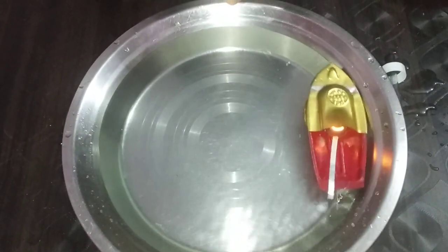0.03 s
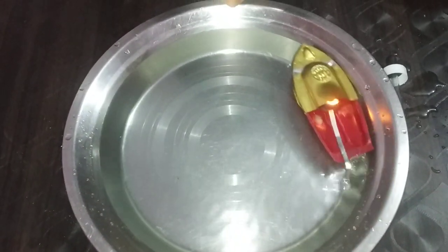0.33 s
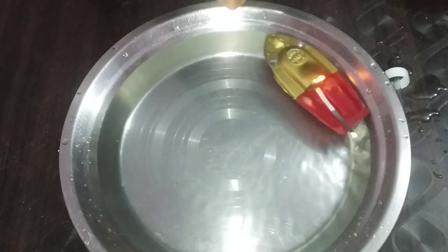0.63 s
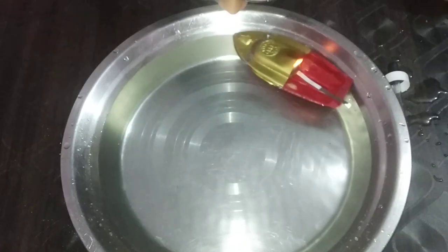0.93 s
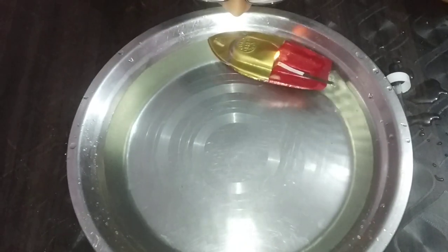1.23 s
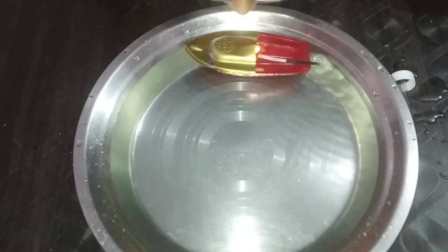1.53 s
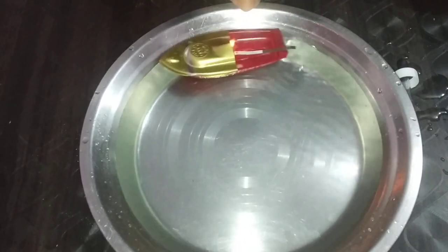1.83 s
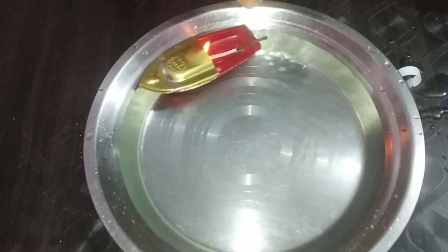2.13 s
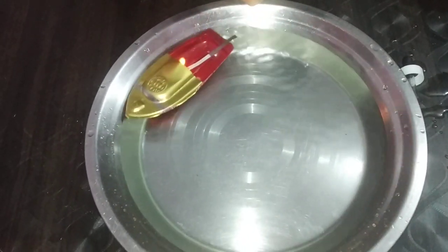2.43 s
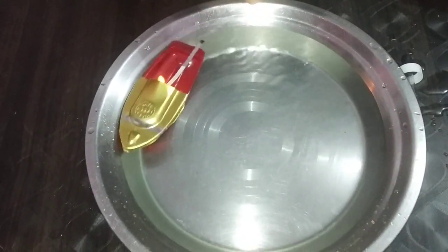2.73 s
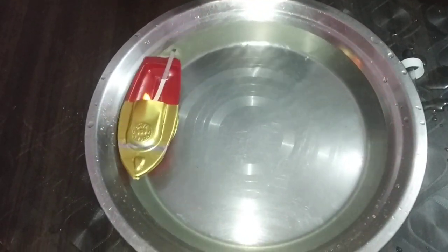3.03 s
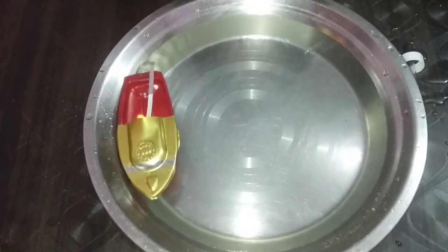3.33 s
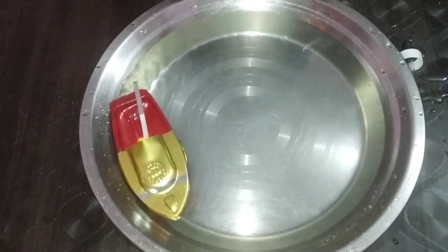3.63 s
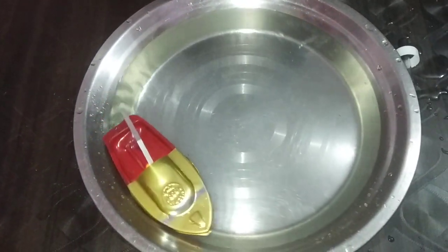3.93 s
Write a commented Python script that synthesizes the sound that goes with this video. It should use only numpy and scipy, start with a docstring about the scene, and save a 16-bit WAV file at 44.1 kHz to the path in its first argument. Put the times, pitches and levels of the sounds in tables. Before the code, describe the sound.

Rapid tinny popping of a toy steam boat circling in water, faltering twice.

```python
"""A tin pop-pop boat circling in a steel basin

About 22 times a second the boiler lid snaps out and back, a spit of hiss follows, and the
thin hull rings. Twice the steam sags and picks up again. Water ticks and splashes at the
stern, bubbles burst, the basin is bumped, and a small room hums underneath."""
import sys
import numpy as np
from scipy import signal
from scipy.fft import rfft, irfft
from scipy.io import wavfile
from scipy.ndimage import uniform_filter1d, map_coordinates

SR = 44100
rng = np.random.default_rng(int(sys.argv[2]) if len(sys.argv) > 2 else 0)


def wrap_up_sound(samples):
    """Save the sound to the file named by the first command line argument, as 16-bit audio."""
    columns = np.atleast_2d(samples).T
    # keep every value between -1 and 1, then stretch to whole-number steps
    tamed = np.clip(columns, -1, 1)
    steps = np.round(tamed * 32767).astype(np.int16)
    wavfile.write(sys.argv[1], SR, steps)


N = 176400  # 4 seconds

# The boat's path. Each row: time in seconds, left ear's delay in ms, left minus right level in dB.
BOAT_PATH = [(0.0, -0.065, 2), (0.6, -0.065, 2), (1.25, 0.0087, 2), (1.6, -0.028, 2), (1.95, 0.1, 2),
             (2.3, 0.1, 8), (2.65, 0.17, 5), (3.3, 0.16, 0.5), (3.6, 0.16, 0.5), (4.0, 0.17, 2.5)]
LEAD_MS = 1.45  # a snap starts this long before its given time


def amp(db):
    """Turn decibels into a factor to multiply by."""
    return 10 ** (np.asarray(db) / 20)


def seconds(ms):
    """Turn milliseconds into seconds."""
    return ms / 1000


def unit_power(x):
    """Scale a signal to an average power of 1."""
    return x / np.sqrt(np.mean(x ** 2) + 1e-20)


def at_pitch(table, hz):
    """Read between a table's rows by frequency."""
    row_hz, values = np.transpose(table)
    return np.interp(np.log(hz + 1), np.log(row_hz), values)


def at(table, where):
    """Read a table's other columns at one value of its first, joining rows by straight lines."""
    first, *rest = np.transpose(table)
    return [np.interp(where, first, column) for column in rest]


def add(mix, start_s, sound):
    """Add a sound to the mix, dropping what falls outside it."""
    i = round(start_s * SR)
    part = mix[:, max(i, 0):max(i + sound.shape[1], 0)]
    part += sound[:, max(-i, 0):][:, :part.shape[1]]


def panned(db):
    """Gains for both ears, with the left louder by db."""
    return amp([[db / 2], [-db / 2]]) / np.sqrt(np.mean(amp([db, -db])))


def colour(x, tone, keep_power=False):
    """Filter to a tone curve; keep_power leaves white noise as strong as it was."""
    size = 4096
    log_gain = np.log(amp(at_pitch(tone, abs(np.fft.fftfreq(size, 1 / SR)))))
    taps = np.fft.ifft(np.exp(np.conj(signal.hilbert(log_gain)))).real[:size // 2]  # never rings early
    if keep_power:
        taps = taps / np.linalg.norm(taps)
    return signal.oaconvolve(x, taps[None], axes=1)[:, :N]


def fizz(envelope, grain_db):
    """A burst of grainy noise with its own random tone, partly alike in both ears."""
    size = len(envelope)
    white = rng.standard_normal((3, size))
    hz, steps_hz = np.fft.rfftfreq(2 * size, 1 / SR), np.arange(0, SR, 300)
    tone_db = np.interp(hz, steps_hz, 3.7 * rng.standard_normal(len(steps_hz)))
    noise = irfft(rfft(white, 2 * size) * unit_power(amp(tone_db)))[:, :size]
    grain = amp(grain_db * unit_power(uniform_filter1d(rng.standard_normal(size), size=30)))
    return envelope * unit_power((noise[:2] + 0.54 * noise[2]) * grain)


def room_hum():
    """The room's low rumble and faint hiss, drifting a little."""
    # The room's tone. Each row: frequency in Hz, relative level in dB.
    tone = [(10, 8), (27, 3.5), (39, 16), (50, -9), (80, -6.5), (125, -9.5), (200, -11), (350, -16),
            (700, -17.5), (1500, -16.5), (2000, -16), (2600, -24.5), (4000, -24.5), (6000, -28.5),
            (10000, -31), (15500, -28.5)]
    # How alike the ears are. Each row: frequency in Hz, likeness (1 means the same).
    likeness = [(30, 0.77), (200, 0.68), (700, 0.83), (3000, 0.15), (12000, 0.033)]
    frames, hz = N // 1024 + 5, np.fft.rfftfreq(4096, 1 / SR)
    a, b, c, d, drift = rng.standard_normal((frames, len(hz), 5)).T
    left, unrelated = a + 1j * b, c + 1j * d
    alike = at_pitch(likeness, hz)[:, None]
    right = alike * left + np.sqrt(1 - alike ** 2) * unrelated
    drift = uniform_filter1d(drift, size=40, axis=0)  # smooth over pitch
    drift = uniform_filter1d(drift, size=5, axis=1)  # and over time
    spectrum = np.array([left, right]) * amp(at_pitch(tone, hz)[:, None] + 1.5 * unit_power(drift))
    noise = signal.istft(spectrum, nperseg=4096, noverlap=3072)[1][:, :N]
    return amp(-49) * unit_power(noise)


def lid_note(ms, hz, ring_ms):
    """A few quickly choked swings of the tin lid, gliding up in pitch as it stiffens."""
    bend, bend_ms, stiffen_per_ms, rise_ms = 0.39, 0.62, 0.024, 0.75
    ms = np.maximum(ms, 0)
    low_start = bend * bend_ms * (1 - np.exp(-ms / bend_ms))
    cycles = hz * seconds(ms - low_start + stiffen_per_ms * ms ** 2 / 2)
    envelope = (1 - np.exp(-(ms / rise_ms) ** 2)) * np.exp(-(ms / ring_ms) ** 2 / 2)
    return -envelope / envelope.max() * np.sin(2 * np.pi * cycles)


def lid_pop(time_s, db, voice):
    """The lid creaks as it gives, snaps with two beating notes, and rebounds. Returns start, sound."""
    hz, ring_ms, overtone_db, rebound_db = at(voice, time_s)
    timing, pitch, creak_shift, bounce, bounce_shift, force = np.clip(rng.standard_normal(6), -2, 2)
    early_ms, jitter_ms = 8, 0.15
    ms = np.arange(round(0.025 * SR)) / SR * 1000 - early_ms + LEAD_MS + jitter_ms * timing
    hz *= 1 + 0.012 * pitch
    creak = lid_note(ms + 4.4 + jitter_ms * creak_shift, hz * 0.81, ring_ms=1.6)
    snap = lid_note(ms, hz, ring_ms) + amp(overtone_db) * lid_note(ms, hz * 1.437, ring_ms)
    rebound = lid_note(ms - 3.05 - jitter_ms * bounce_shift, hz * 1.087, ring_ms=1.6)
    lid = amp(-21) * creak + snap + amp(rebound_db + 1.5 * bounce) * rebound
    _, pan_db = at(BOAT_PATH, time_s)
    return time_s - seconds(early_ms), amp(db - 1 + 1.5 * force) * panned(pan_db) * lid


def hull_ping(push):
    """The thin hull rings when pushed, with different notes standing out each time."""
    # The tin's notes. Each row: pitch in Hz, relative level in dB, seconds to fade by 60 dB.
    notes = [(3250, -14, 0.078), (3790, -14.5, 0.079), (4530, -7, 0.051), (5860, 0, 0.019),
             (6080, 0.5, 0.01), (6320, -0.5, 0.017), (7450, -6.5, 0.012), (8180, -13.5, 0.017)]
    t = np.arange(SR // 12) / SR
    ring = np.zeros(len(t))
    for hz, db, fade_s in notes:
        envelope = amp(db + 2.5 * rng.standard_normal() - 60 * t / fade_s)
        hz *= 1 + 0.008 * rng.uniform(-1, 1)
        ring += envelope * np.cos(2 * np.pi * (hz * t + rng.random()))
    return amp(-3.5) * signal.fftconvolve(push, ring[None] / np.linalg.norm(ring), axes=1)


def boiler():
    """On each stroke the lid snaps out and back, a spit of hiss follows, and the hull rings."""
    # The rhythm. Each row: stroke number, time in seconds, wait between the two snaps in ms.
    pace = [(0, -.005, 15.7), (1, .0382, 16), (4, .1684, 15), (8, .3456, 15.3), (12, .5204, 15.2),
            (15, .647, 14.7), (16, .69, 13.5), (17, .738, 16), (24, 1.054, 14), (27, 1.1882, 12.8),
            (30, 1.3237, 15), (36, 1.5907, 16), (40, 1.766, 15.8), (47, 2.077, 14.5), (52, 2.2977, 15.4),
            (58, 2.558, 16.6), (61, 2.686, 14), (70, 3.099, 11), (74, 3.2841, 14.5), (78, 3.4733, 16.5),
            (83, 3.7047, 15.3), (89, 3.9813, 15.5)]
    # Steam strength. Each row: time in seconds, then out-snap, back-snap and hiss in relative dB.
    steam = [(0.0, -20, -24.5, -43), (0.2, -19.5, -24, -44), (0.4, -19, -22.5, -38), (0.6, -20.5, -20, -39),
             (0.7, -26.5, -27, -43), (0.76, -41, -36, -55), (0.83, -38, -40.5, -84), (0.98, -48, -42, -60),
             (1.11, -31, -29, -58), (1.21, -18, -19.5, -41), (1.3, -17, -20, -36),
             (1.8, -17.5, -16.5, -33.5), (2.1, -17.5, -17.5, -39), (2.4, -22.5, -18.5, -38),
             (2.6, -21, -20.5, -39), (2.7, -21.5, -26, -36), (2.9, -44, -43, -73), (3.03, -42.5, -76, -63),
             (3.1, -30, -28, -83), (3.2, -27, -29.5, -47.5), (3.4, -24.5, -23, -40), (3.6, -23, -25.5, -39),
             (4.0, -23.5, -25, -44.5)]
    # How the lid rings, going out and going back, as the boiler heats and cools.
    # Each row: time in seconds, base pitch in Hz, ring time in ms, overtone in dB, rebound in dB.
    out_voice = [(0, 1754, 1.4, -26, -0.5), (.55, 1717, 3.2, -22, -13), (.9, 1630, 1.7, -29, -2),
                 (1.3, 1726, 3, -36, -26), (1.8, 1724, 3.5, -34, -15), (2.101, 1664, 2.2, -39, -39),
                 (2.6, 1540, 1.2, -9, -6), (3.2, 1516, 1.57, -18, -2.5), (3.601, 1630, 1.2, -29, -4),
                 (4, 1630, 1.5, -24, 0.5)]
    back_voice = [(0, 1440, 3.5, -10, -35), (.45, 1577, 2.1, -18, -8.5), (.9, 1664, 1.3, -13, -2.5),
                  (1.3, 1656, 1.1, -30, -3), (1.8, 1606, 1.7, -35, -12), (2.1, 1586, 2.04, -51, -8),
                  (2.6, 1450, 2.44, -15.5, 0.5), (3.2, 1520, 1.3, -7.5, -7), (3.6, 1437, 4.9, -6.5, -8),
                  (4, 1380, 7.8, -14, -9)]
    # The bare hiss beside the ringing tin. Each row: time in seconds, boost in dB.
    hiss_boost = [(0, 5), (.6, 4.5), (1.5, -1.5), (2.4, 0), (3.4, -2.5), (4, 0)]
    # The tones of the hull and the hiss. Each row: frequency in Hz, relative level in dB.
    hull_tone = [(100, 10), (400, -5.5), (700, 0), (950, -4), (1200, -0.5), (1500, 0.5), (1800, -2),
                 (2200, 2.5), (2600, -11), (6000, -18)]
    hiss_tone = [(200, -5.5), (800, 6), (2200, 9), (2650, 3), (3300, 3.5), (4100, 3.5), (5000, 2.5),
                 (5450, 2.5), (6100, 0.5), (7100, -7.5), (7900, 2.5), (9000, -11.5), (10500, -6),
                 (12500, -16.5), (15500, -48)]
    lid, hiss, ring = np.zeros((3, 2, N))
    hiss_peak_ms, lead_s = 6.13, seconds(LEAD_MS)
    age = np.arange(SR // 25) / SR / seconds(hiss_peak_ms)
    swell = (age * np.exp(1 - age)) ** 2
    for stroke in range(pace[-1][0] + 1):
        out_s, wait_ms = at(pace, stroke)
        out_db, back_db, hiss_db = at(steam, out_s)
        out_s += seconds(ms=7) * rng.uniform(-1, 1) * (out_db < -38)  # weak strokes stumble
        back_s = out_s + seconds(wait_ms)
        add(lid, *lid_pop(out_s, out_db, out_voice))
        add(lid, *lid_pop(back_s, back_db, back_voice))
        spit = fizz(swell, grain_db=2.5) * amp(hiss_db - 4 + 2.2 * rng.uniform(-1, 1))
        add(hiss, back_s - lead_s, spit * panned(-1.5) * amp(at(hiss_boost, out_s)[0]))
        add(ring, back_s - lead_s, hull_ping(spit))
        add(ring, out_s - lead_s, amp(-15) * hull_ping(spit))
    return ring + colour(lid, hull_tone) + colour(hiss, hiss_tone, keep_power=True)


def water():
    """Short bright splashes at the stern, with tiny drips at random between them."""
    # The splashes. Each row: start in seconds, relative level in dB, left minus right in dB.
    splashes = [(0.5346, -40.5, 5), (0.618, -40.5, 6), (0.6857, -38, 6), (0.713, -39.5, 5),
                (0.7532, -45, 14), (0.7927, -40, 3), (0.9302, -45.5, 2), (1.113, -47.5, 1),
                (1.2093, -43.5, 1), (1.651, -37, 2), (2.044, -38, -1), (2.223, -47, 3), (2.4946, -38.5, 3),
                (2.665, -44.5, 6), (2.942, -40, -3), (2.9722, -43, -2), (3.063, -49, -1),
                (3.1156, -34.5, -0.5), (3.264, -50, 5), (3.352, -48, 4), (3.448, -42, -1), (3.68, -50, 13),
                (3.7333, -50, 10)]
    # The spray's tone. Each row: frequency in Hz, relative level in dB.
    tone = [(300, -65), (1500, 0), (3000, -4.5), (6000, 1.5), (9000, 0), (13000, -2), (16000, -37)]
    out, t = np.zeros((2, N)), np.arange(SR // 30) / SR
    drips_per_s, tries, decay_ms = 18, 200, 4
    drips = [(when * N / SR, -59 + 8 * size, 3) for when, size, chance in rng.random((tries, 3))
             if chance < drips_per_s * N / SR / tries]
    for start_s, db, pan_db in list(splashes) + drips:
        splash = fizz(np.exp(-t / seconds(decay_ms)), grain_db=5.5)
        add(out, start_s, amp(db + 4.5) * panned(pan_db) * splash)
    return colour(out, tone, keep_power=True)


def bubbles():
    """Each bubble bursting behind the boat rings briefly and rises in pitch."""
    # The bursts. Each row: start in seconds, starting pitch in Hz, level in dB.
    bursts = [(0.451, 4900, -30), (0.538, 5960, -29.5), (0.62, 3540, -32), (0.624, 4150, -32),
              (0.686, 7700, -30), (0.706, 3780, -35), (0.717, 3840, -32.5), (1.004, 8300, -42),
              (1.048, 8230, -43), (2.495, 14300, -38), (2.68, 5800, -37.5), (3.114, 5800, -34),
              (3.7316, 9970, -34.5)]
    out, t = np.zeros((2, N)), np.arange(SR // 30) / SR
    decay_ms, rise_per_s = 2.6, 5.9
    for start_s, hz, db in bursts:
        chirp = np.sin(2 * np.pi * hz * t * (1 + rise_per_s * t / 2))
        add(out, start_s, amp(db) * panned(5.2) * np.exp(-t / seconds(decay_ms)) * chirp)
    return out


def basin_bumps():
    """Each bump is a soft thud that rings the low notes of the filled basin."""
    # The bumps. Each row: start in seconds, then thud and ring in relative dB.
    bumps = [(1.585, -40, -48.5), (1.6091, -37, -48), (1.724, -52, -56), (2.11, -49.5, -68),
             (2.943, -45.5, -74)]
    # The basin's notes. Each row: pitch in Hz, relative level in dB, seconds to fade by 60 dB.
    notes = [(42.2, 9, 0.17), (120, -8, 1.1), (198, -3, 0.66), (287, -3.5, 0.32), (335, 7.5, 0.23),
             (367, -4, 0.2), (530, -13, 3.6), (640, -18, 6.5)]
    out, t = np.zeros((2, N)), np.arange(SR * 2) / SR
    ring = sum(amp(db - 60 * t / fade_s) * np.sin(2 * np.pi * hz * t) for hz, db, fade_s in notes)
    rise_s, thud_decay_ms, thud_top_hz = 0.00067, 4.2, 400
    onset = 1 - np.exp(-t / rise_s)
    muffle = signal.butter(4, thud_top_hz, fs=SR, output="sos")
    for start_s, thud_db, ring_db in bumps:
        rumble = unit_power(signal.sosfilt(muffle, rng.standard_normal(len(t))))
        thud = amp(thud_db + 7) * rumble * np.exp(-t / seconds(thud_decay_ms))
        add(out, start_s, panned(0) * onset * (thud + amp(ring_db) * ring))
    return out


def circling(x):
    """As the boat circles, the nearer ear hears it first."""
    n = np.arange(N)
    lag_ms, _ = at(BOAT_PATH, n / SR)
    shift = seconds(lag_ms) * SR / 2
    return np.array([map_coordinates(ear, [n + side * shift], order=5) for ear, side in zip(x, (-1, 1))])


def echoes(x, fade_times, start_ms):
    """Scattered echoes for each ear; fade_times sets how fast each frequency dies away."""
    size, count = SR // 2, 3000
    taps = np.zeros((2, size))
    where, sign = rng.integers(20, size - 20, count), rng.choice([-1., 1.], count)
    taps[0, where] = sign
    taps[1, where + rng.integers(-15, 16, count)] = sign  # a little earlier or later on the right
    taps *= np.arange(size) / SR > seconds(start_ms)
    hz, t, spectrum = signal.stft(taps, SR, nperseg=128)
    fade = amp(-60 * t / at_pitch(fade_times, hz)[:, None])
    tail = signal.istft(spectrum * fade, SR, nperseg=128)[1]
    return signal.fftconvolve(x, tail / np.linalg.norm(tail, axis=1, keepdims=True), axes=1)[:, :N]


def basin_echoes(x, places=7):
    """Quick echoes off the basin's walls; their pattern changes as the boat moves on."""
    position = np.linspace(0, places - 1, N)
    blends = (np.sqrt(np.maximum(1 - abs(position - k), 0)) for k in range(places))
    return sum(echoes(x * blend, fade_times=[(1000, 0.06)], start_ms=4.4) for blend in blends)


def room_echoes(x):
    """The small room's echoes, with the lows lasting longest."""
    # The room's fade. Each row: frequency in Hz, seconds to fade by 60 dB.
    fade_times = [(200, 0.42), (1500, 0.31), (6000, 0.32), (15000, 0.17)]
    return echoes(x, fade_times, start_ms=9.7)


def scene():
    """Boat and water in the basin, then the room around them."""
    hum, bumps, boat, wet = room_hum(), basin_bumps(), boiler(), water() + bubbles()
    near = circling(boat + wet) + amp(-9.5) * basin_echoes(boat) + bumps
    return hum + near + amp(-8.5) * room_echoes(boat + wet + bumps)


def record(dry):
    """Cut the very highest treble."""
    top_hz = 15900
    low_pass = signal.firwin(511, top_hz, window=("kaiser", 9), fs=SR)
    return signal.oaconvolve(dry, low_pass[None], "same")


dry = scene()
out = record(dry)
wrap_up_sound(out)
```